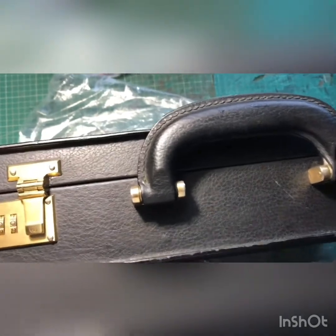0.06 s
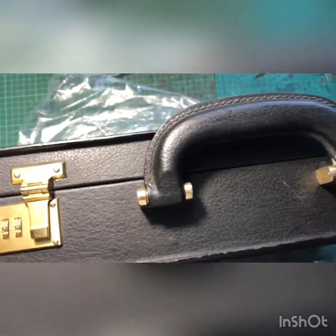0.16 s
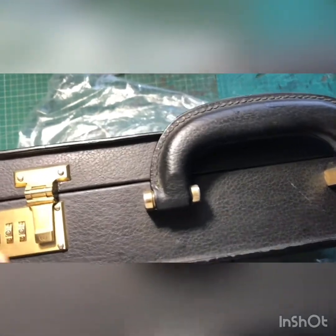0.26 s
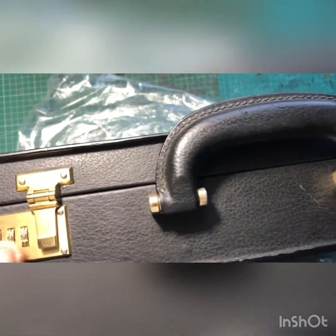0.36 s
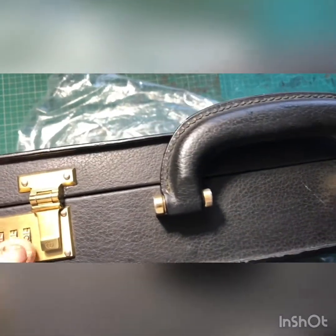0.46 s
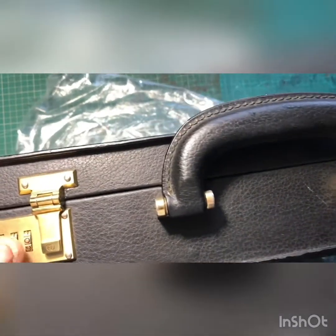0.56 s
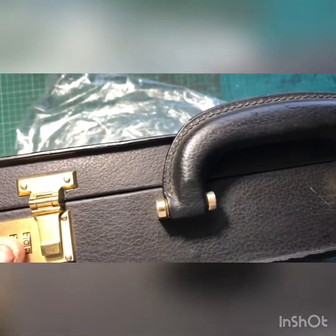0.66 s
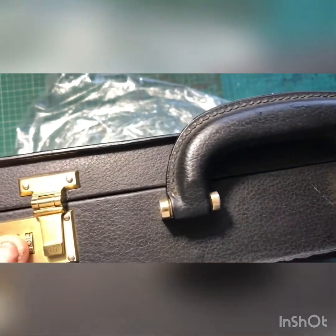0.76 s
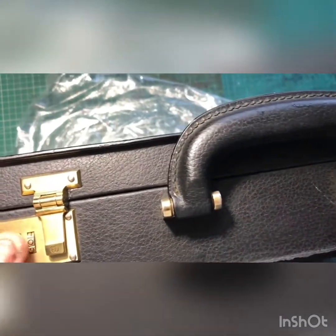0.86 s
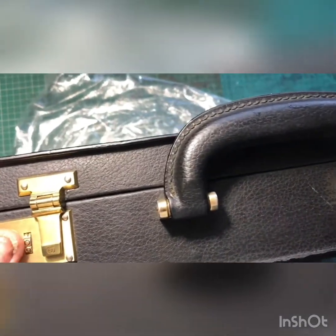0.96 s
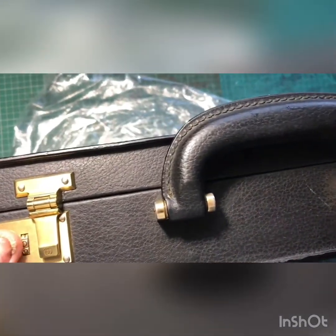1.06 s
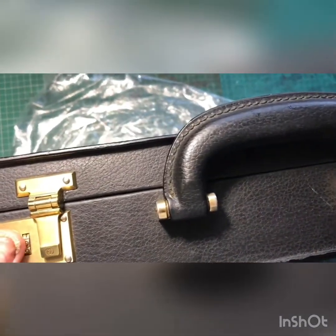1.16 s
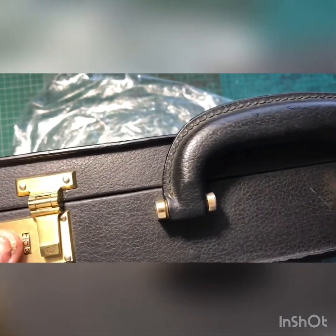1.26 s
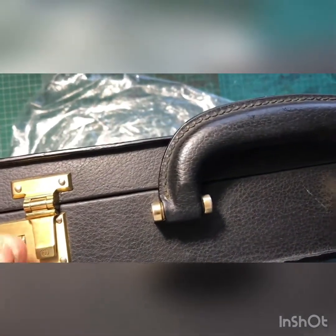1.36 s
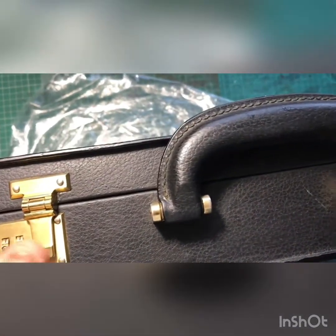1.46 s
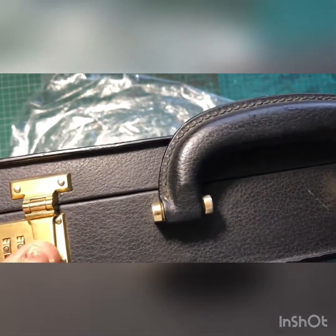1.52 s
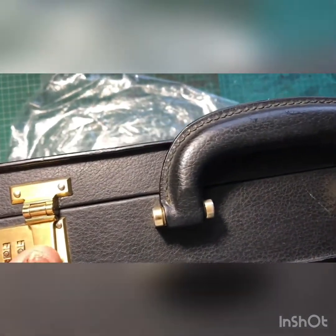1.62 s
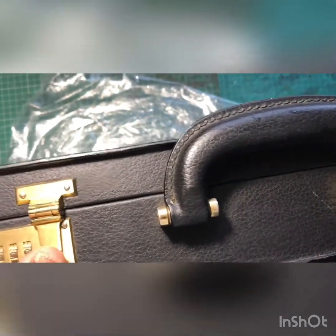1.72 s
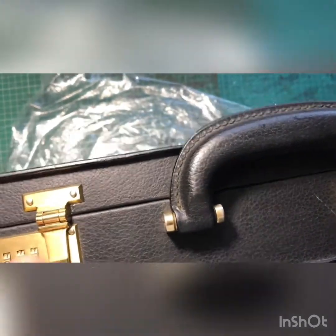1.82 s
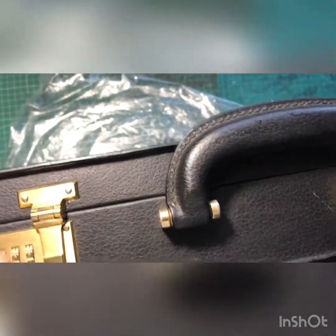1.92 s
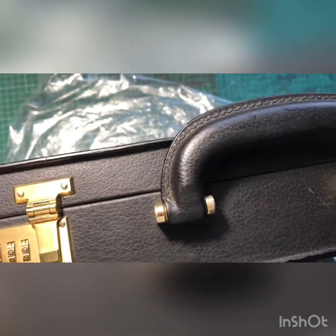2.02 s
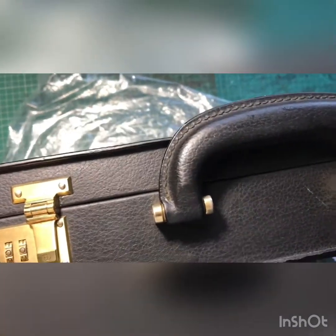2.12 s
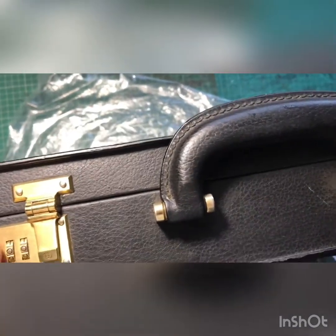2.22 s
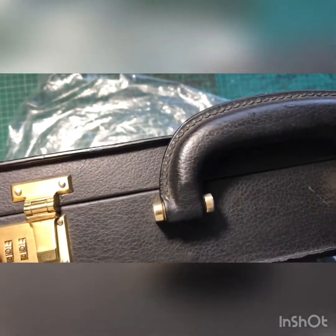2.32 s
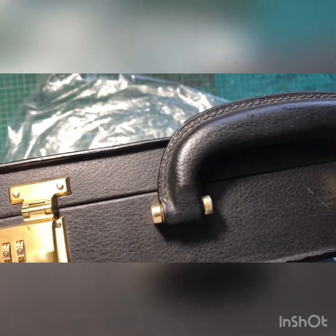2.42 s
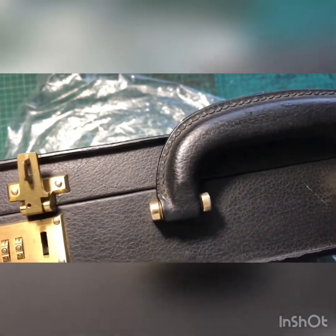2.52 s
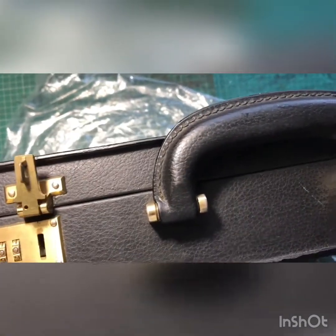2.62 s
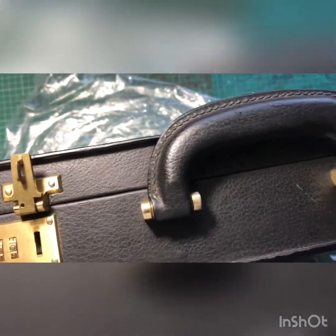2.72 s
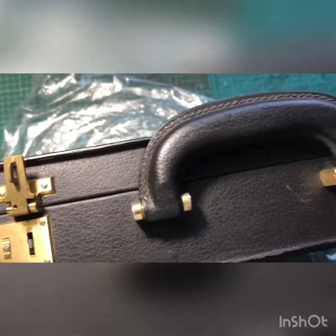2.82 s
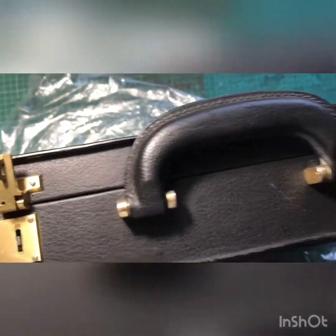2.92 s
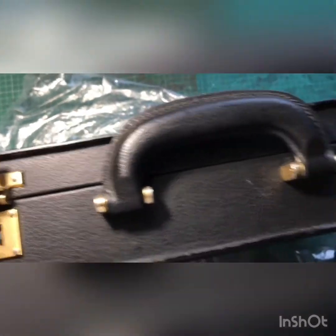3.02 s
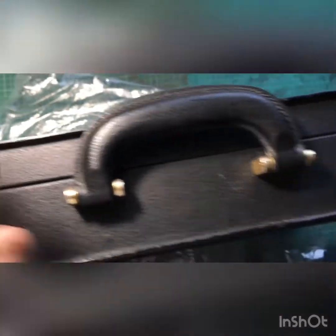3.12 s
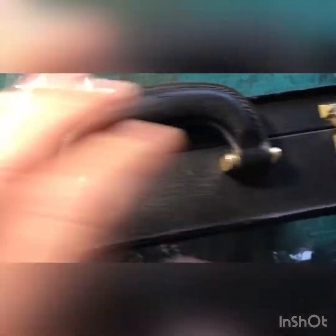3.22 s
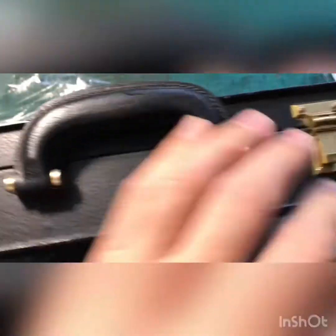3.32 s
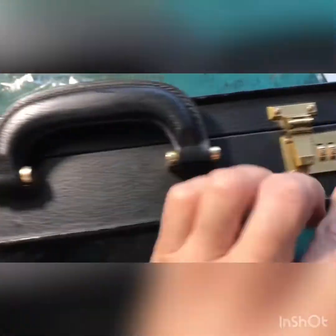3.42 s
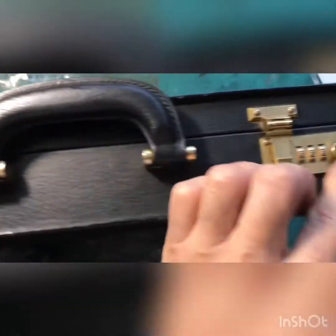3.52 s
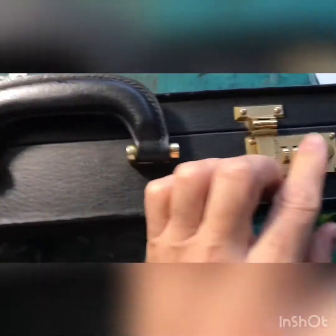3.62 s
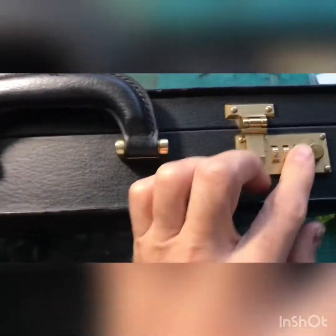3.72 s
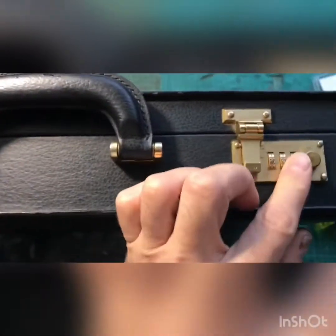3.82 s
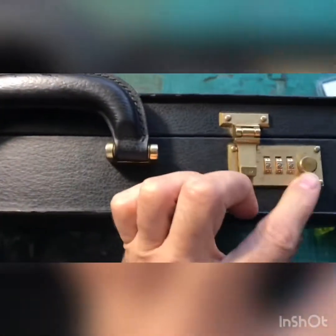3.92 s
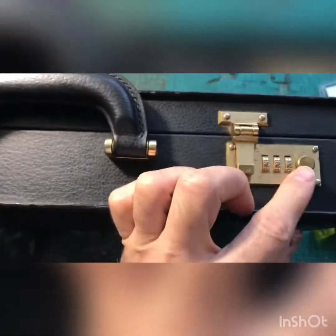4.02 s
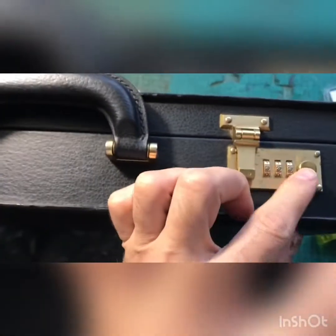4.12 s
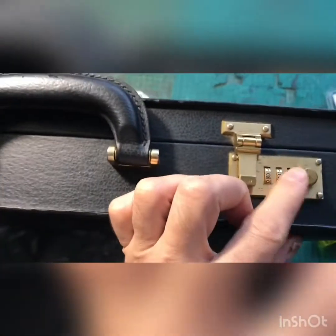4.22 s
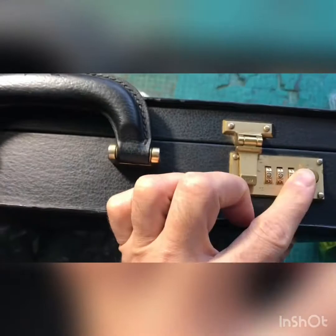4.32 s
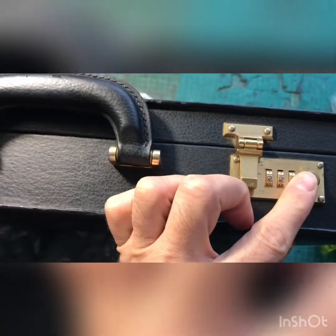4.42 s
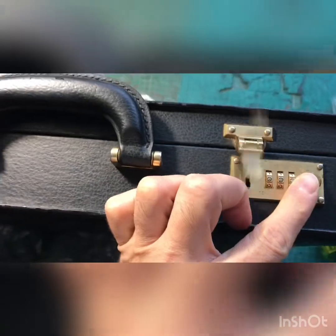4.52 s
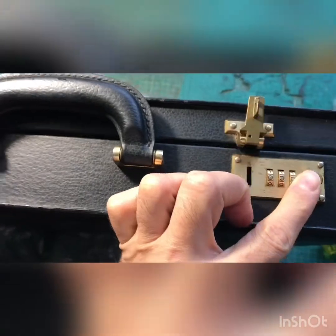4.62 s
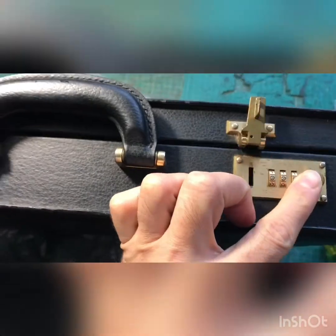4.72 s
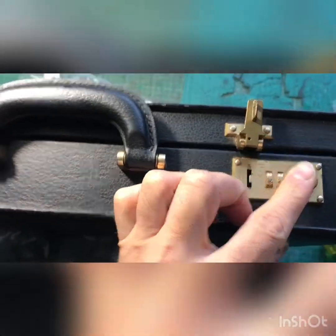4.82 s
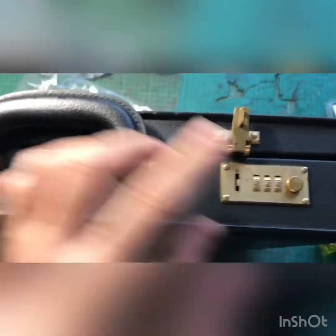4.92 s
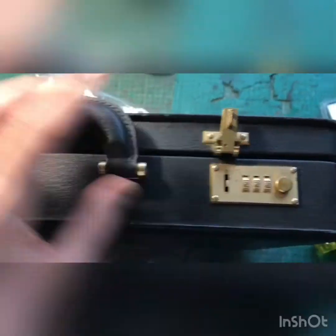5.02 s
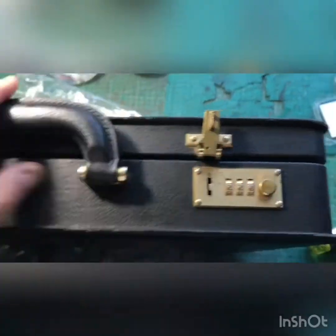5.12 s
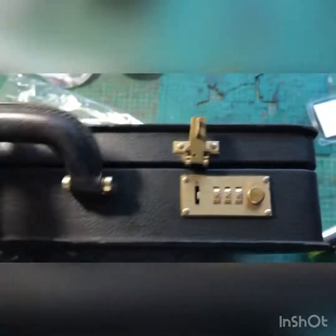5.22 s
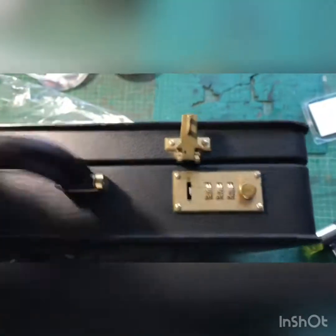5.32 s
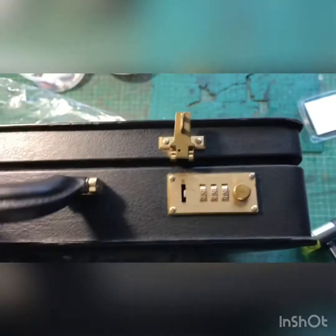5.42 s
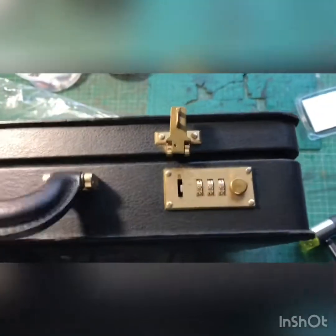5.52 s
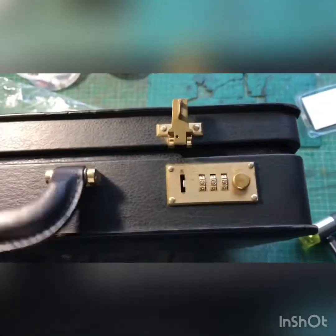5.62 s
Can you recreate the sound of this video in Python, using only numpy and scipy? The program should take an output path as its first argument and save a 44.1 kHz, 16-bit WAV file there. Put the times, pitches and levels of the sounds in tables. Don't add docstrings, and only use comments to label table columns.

```python
import sys
import numpy as np
from scipy import signal
from scipy.io import wavfile
from scipy.ndimage import uniform_filter1d

SR = 44100
rng = np.random.default_rng(int(sys.argv[2]) if len(sys.argv) > 2 else 0)


def level_to_linear(level):
    exponent = np.asarray(level, float) / 20
    return 10 ** exponent


def generate_wav(sig):
    pcm = np.round(np.clip(np.atleast_2d(sig).T, -1, 1) * 32767).astype(np.int16)
    wavfile.write(sys.argv[1], SR, pcm)


N = 249606

# frequency in Hz, level in dB, t60 in seconds.
PANEL_MODES = [(560, -7.5, 0.021), (680, -5.5, 0.045), (787, -4.5, 0.023), (800, -9.5, 0.045),
               (830, -14, 0.049), (977, 2, 0.05), (1035, -4.5, 0.12), (1059, -3.5, 0.019), (1152, 5, 0.037),
               (1236, 1.5, 0.046), (1344, 3, 0.054), (1448, -2, 0.05), (1502, 0.5, 0.04),
               (1585, -0.5, 0.032), (1705, 2, 0.068), (1808, -4, 0.037), (1971, -3.5, 0.049),
               (2240, -1.5, 0.01), (2260, -4, 0.0043), (2794, -4.5, 0.035)]
# start in seconds, force in dB,
# spot from body (0) over lock plate (.5) to hasp (1), loss across the lock in dB, weight on the case in dB.
HASP_BLOWS = [(2.3855, -24.5, 0, 20.5, -23), (2.3916, -6, 0.28, 20, -16), (2.3937, -12, 0.05, 29, -25),
              (2.4121, -39, .02, 10, -8), (2.4168, 4, .15, 11.5, -9), (2.4206, -0.5, 0.36, 18, -12.5),
              (2.4239, -6, .02, 11, -34.5), (2.446, 10, 0.26, 40, -12.5), (2.4505, -8, 0.46, 6.5, -28),
              (2.4564, -4.5, 0.13, 28, -29.5), (4.4708, -8.5, 0.34, 20.5, -15.5),
              (4.4886, -18.5, 0.34, 18.5, -15), (4.4967, 9, 0.17, 41, -12.5), (4.4986, -6, 0.1, 7.5, -17.5),
              (4.5028, 5, 0.09, 15.5, -7.5), (4.5233, -1.4, 0.03, 8.5, -30), (4.5362, -6, 0.03, 9.5, -13.5),
              (4.5434, -19.5, .02, 3.5, -39)]


def hasps():
    return blows(HASP_BLOWS, PANEL_MODES, length=0.65, deep=0, spread_db=3,
                 boom_off_db=-3.5, boom_length=.62, lowest_hz=250)


# frequency in Hz, level in dB, t60 in seconds.
HOUSING_MODES = [(1133, -9, 0.032), (1420, -3, 0.0239), (1523, 2.5, 0.011), (2300, 2, 0.02),
                 (2576, -2, 0.02), (3370, -10.5, 0.027), (4020, -9, 0.032), (4405, -13, .025)]
# start in seconds, force in dB,
# spot from body (0) to hasp (1), loss across the lock in dB, weight on the case in dB.
BUTTON_BLOWS = [(.8611, -28.5, .3, 38, -39.5), (1.4792, -28.5, 0.2, 20, -54),
                (1.7642, -7.5, .04, 11.5, -33), (2.3709, -34, 0, 13, -41), (2.6793, -28.5, 0.45, 11, -36),
                (2.6869, -46, .1, 4, -38), (2.7088, -17.5, 0.74, 10, -30), (2.7131, 0.5, 0.76, 35.5, -39.5),
                (2.7148, -10, .05, 8, -26), (2.9534, -37, 0.58, 18, -43.5),
                (3.5157, -39.5, 0.48, 22.5, -35.5), (3.6468, -30.5, 0.6, 7.5, -46.5),
                (4.1169, -21, 0.65, 29.5, -56.5), (4.7603, -19.5, 0.4, 34, -35.5),
                (5.068, -44, 1, 5.5, -28.5), (5.2187, -35, .55, 31, -37), (5.2269, -28.5, .3, 2.5, -24),
                (5.3815, -34.5, 0.36, 15, -33), (5.4746, -51, 0.2, 17, -43), (5.4993, -42, .02, 12, -41),
                (5.6069, -22, 0.27, 27, -34.5)]


def button_clicks():
    return blows(BUTTON_BLOWS, HOUSING_MODES, length=0.59, deep=0.08, spread_db=1.5,
                 boom_off_db=-3.5, boom_length=0.84, lowest_hz=850)


# start in seconds, force in dB, spot from body (0) to hasp
LOCK_TICKS = [(.5372, -38, 0), (.803, -34.5, 0.15), (.925, -53, .5), (1.519, -40, .6),
              (1.6022, -32.5, 0.78), (1.6065, -49, 0.5), (1.6321, -32, 0.7), (1.644, -34.5, .51),
              (1.6576, -36, .71), (1.6929, -28.5, 0.61), (1.7181, -29, 0.59), (1.756, -33, .51),
              (1.8807, -40, 0.5), (1.912, -43, .51), (2.186, -45, .73), (2.2374, -47.5, .51),
              (2.504, -40, .75), (2.825, -53, .97),
              (3.8058, -36, .25), (3.866, -40.5, .72), (3.886, -41.5, 0.75), (3.898, -42.5, 0.4),
               (4.128, -26.5, 0.44), (4.1605, -38, 0.15), (4.165, -43, 0.06), (4.739, -38, .05),
               (4.7624, -31, .97), (4.7645, -30.5, 0.46), (4.767, -33.5, 0.5), (5.1798, -36.5, 0.8),
               (5.4064, -38.5, 0.2), (5.418, -40.5, 0.86), (5.4268, -37, 0.17), (5.516, -39, .75),
               (5.5266, -38.5, 0.4)]


def light_ticks():
    loss_db, weight_db = 25.5, -20
    rows = [(s, db, spot, loss_db, db + weight_db) for s, db, spot in LOCK_TICKS]
    return blows(rows, HOUSING_MODES, length=.42, deep=0, spread_db=4.0,
                 boom_off_db=-1, boom_length=0.45, lowest_hz=1300)


# start in seconds, force in dB, weight on the case in dB.
FINGER_KNOCKS = [
    (1.4971, -26, -28),
    (1.9446, -27.5, -44),
    (4.0273, -26.5, -33),
    (4.224, -30, -38.5),
    (4.7316, -42, -64),
    (5.1157, -36.5, -36.5),
    (5.2979, -34, -26),
    (5.614, -35.5, -40),
]


def leather_knocks():
    loss_db = 24
    rows = [(s, db, 0, loss_db, weight_db) for s, db, weight_db in FINGER_KNOCKS]
    return blows(rows, PANEL_MODES, length=0.55, deep=0, spread_db=3.5,
                 boom_off_db=-3.5, boom_length=0.58, lowest_hz=250)


# frequency in Hz, level in dB, t60 in seconds.
CASE_MODES = [(153, -12.5, 0.091), (201.9, 1, 0.11), (230.7, -8, 0.13), (305, -3.5, 0.084),
              (402, -12.5, .08), (497, -12, 0.058)]


def blows(rows, body, length, deep, spread_db, boom_off_db, boom_length, lowest_hz):
    hard, boom = np.zeros(N), np.zeros(N)
    for s, force_db, spot, loss_db, boom_db in rows:
        body_db, plate_db, hasp_db = force_db - loss_db * abs(spot - np.arange(3) / 2)
        lasting = length + deep * (.5 - spot)
        body_ring = ring(body, lasting * 0.87, spread_db, rise_s=0.00036)
        plate = crack(1700, 8000, t60=.021, tilt_db=-13, length=lasting, scatter=0.93)
        hasp = crack(6200, 17500, t60=.014, tilt_db=0, length=lasting, scatter=0.49)
        add(hard, s, level_to_linear(body_db) * body_ring)
        add(hard, s, level_to_linear(plate_db - 3.5) * plate)
        add(hard, s, level_to_linear(hasp_db + 2.0) * hasp)
        case = ring(CASE_MODES, boom_length, spread_db=3.0, rise_s=0.0073)
        add(boom, s, level_to_linear(boom_db + boom_off_db) * case)
    high_pass = signal.butter(3, lowest_hz, "high", fs=SR, output="sos")
    return boom + signal.sosfilt(high_pass, hard)


def ring(modes, length, spread_db, rise_s):
    hz, db, t60 = np.transpose(modes)[:, :, None]
    t60 = t60 * max(length, .05)
    t = np.arange(round(t60.max() * SR)) / SR
    level_spot, pitch_spot = rng.standard_normal((2, len(modes), 1))
    decay = level_to_linear(db + spread_db * level_spot - 60 * t / t60)
    tones = decay * np.sin(2 * np.pi * hz * (1 + .008 * pitch_spot) * t)
    sound = -tones.sum(0) * (1 - np.exp(-t / rise_s))
    return sound / abs(sound).max()


def crack(low_hz, high_hz, t60, tilt_db, length, scatter):
    t = np.arange(1000) / SR
    shift, phase = rng.random((2, 48, 1))
    place = (np.arange(48)[:, None] + shift) / 48
    size = level_to_linear(tilt_db * place) * np.sqrt(np.sin(np.pi * place))
    hz = low_hz + (high_hz - low_hz) * place
    modes = size * np.sin(2 * np.pi * (hz * t + scatter * phase))
    decay = level_to_linear(-60 * t / (t60 * max(length, .05)))
    sound = modes.sum(0) * decay * (1 - np.exp(-t / .0001))
    return sound / abs(sound).max()


# start in seconds, length in seconds, frequency in Hz,
# width of its wander in Hz, level in dB.
BUTTON_SQUEAKS = [
    (2.700, .013, 5200, 120, -27),
    (2.726, .010, 8100, 80, -32),
    (4.451, .010, 8100, 80, -62),
    (4.471, .016, 8150, 90, -15),
    (4.484, .010, 8100, 90, -33),
    (4.472, .005, 15000, 300, -24),
    (4.476, .006, 15100, 300, -26),
]


def squeaks():
    out = np.zeros(N)
    for s, length, hz, width_hz, db in BUTTON_SQUEAKS:
        n = round(length * SR)
        wander = width_hz * evened(uniform_filter1d(rng.standard_normal(6000), size=60))[:n]
        phase = 2 * np.pi * np.cumsum(hz + wander) / SR
        add(out, s, level_to_linear(db) * np.sin(phase) * np.hanning(n) ** .7)
    return out


# start in seconds, frequency in Hz, level in dB, t60 in seconds.
SPRING_TONES = [
    (2.7132, 8040, -7, .015),
    (2.7132, 8134, -41, .22),
    (2.7132, 15250, -11, .012),
    (2.7132, 3390, -17, .016),
    (4.7602, 12800, -46, .05),
    (4.7602, 15500, -46, .02),
    (4.7602, 9700, -44, .02),
]


def button_springs():
    out, t = np.zeros(N), np.arange(9000) / SR
    for s, hz, db, t60 in SPRING_TONES:
        add(out, s, level_to_linear(db - 60 * t / t60) * np.sin(2 * np.pi * hz * t))
    return out


# frequency in Hz, level in dB per Hz.
RUB_SPECTRUM = [(1760, -26.5), (3000, -3), (3720, -5), (8500, -2), (10400, -6), (15000, -1.5), (16200, -10),
                (16500, -31.5)]
# start in seconds, length in seconds, hiss in dB, scrape in dB,
# sharpness of the start 0-1.
SCUFFS = [(0.045, 0.13, -73, -86, 0.2), (.32, 0.054, -74, -90, .1), (0.469, 0.15, -62.5, -70, 0.02),
          (.9, .07, -75, -87, 0.1), (1.347, 0.064, -70.5, -90, 0.5), (1.475, 0.13, -64, -69, 1),
          (1.599, 0.19, -59.5, -61, 1), (1.755, 0.033, -83, -73, .9), (2.36, 0.019, -62, -48.5, 0.15),
          (2.678, 0.067, -55.5, -43, 1), (3.337, 0.051, -76.5, -78.5, 0.14), (3.637, 0.21, -71.5, -69, 1),
          (3.795, 0.15, -73, -72, 0.68), (4.117, 0.021, -71, -58.5, 0.6), (4.722, 0.066, -66, -51.5, 0.6),
          (5.054, 0.12, -65, -61.5, 0.6), (5.172, 0.11, -64.5, -64, 0.4), (5.255, 0.12, -58.5, -67, 0.13),
          (5.356, 0.19, -69, -66.5, 0.8), (5.602, 0.06, -64, -53, 0.5)]


def scuffs():
    hiss, scrape = np.zeros(N), np.zeros(N)
    for s, length, hiss_db, scrape_db, sharp in SCUFFS:
        u = np.linspace(0, 1, round(length * SR))
        attack = np.minimum(u / np.clip(.5 - 1.23 * sharp, .01, 1), 1)
        release = np.minimum((1 - u) / 0.25, 1) ** 1.3
        add(hiss, s, level_to_linear(hiss_db) * attack * release)
        add(scrape, s, level_to_linear(scrape_db) * attack * release)
    grain = level_to_linear(2.5 * evened(uniform_filter1d(rng.standard_normal(N), size=150)))
    brass = noise([(500, -15), (900, 6.5), (2500, 4.0), (4500, -0.5), (7000, -35.5)], patchy_db=3)
    return grain * (hiss * noise(RUB_SPECTRUM, patchy_db=0.0) + scrape * brass)


# time in seconds, shaking of the case in dB, grip on the phone in dB.
HANDLING = [(0.0, -57, -64), (0.58, -60.5, -65), (0.91, -56, -66), (1.26, -56, -72), (1.53, -54.5, -63.5),
            (1.92, -54, -66), (2.18, -56.5, -66), (2.36, -54, -64), (2.6, -53.5, -67), (2.77, -55.5, -67),
            (3.31, -50, -66.5), (3.67, -51, -59), (4.1, -49.5, -64), (4.43, -52, -59), (5.11, -47.5, -69.5),
            (5.49, -47.5, -57), (5.66, -47.5, -62)]


def handling():
    s, *columns = np.transpose(HANDLING)
    shake_db, rumble_db = (np.interp(np.arange(N) / SR, s, c) for c in columns)
    above_calm_db = shake_db + 54
    far_db = -64 + .15 * above_calm_db
    murmur_db = -64 + 0.93 * above_calm_db
    far = noise([(700, -26.5), (1000, 3.5), (1700, -3.5), (3000, -10), (5000, -25)], patchy_db=0.5)
    murmur = noise([(280, -34.5), (350, 4), (600, 2), (900, 1.0), (1200, -36.0)], patchy_db=0.0)
    shake = noise([(90, -15.0), (125, 2.5), (160, 6.5), (200, 8.5), (250, -6), (320, -3.5), (420, -45.5)],
                  patchy_db=1.5)
    rumble = noise([(15, -29.5), (30, -5), (40, 12.5), (65, -1), (85, -12.5), (105, -34)], patchy_db=2.0)
    distant = level_to_linear(far_db - 1.5) * far + level_to_linear(murmur_db - 1) * murmur
    return distant + level_to_linear(shake_db - 0.5) * shake + level_to_linear(rumble_db + 3.7) * rumble


# frequency in Hz, t60 in seconds.
ROOM_DECAY = [(150, 0.26), (500, 0.39), (1200, 0.27), (3000, 0.24), (8000, 0.21), (15000, 0.14)]


def room(x):
    out, turn = np.zeros(N), np.arange(N) / SR * 2 * np.pi * 17
    at = np.arange(120, SR // 2 - 20, 20)
    for k in range(3):
        taps = np.zeros(SR // 2)
        taps[at + rng.integers(0, 20, len(at))] = rng.choice([-1., 1.], len(at))
        hz, t, z = signal.stft(taps, SR, nperseg=256)
        decay = level_to_linear(-60 * t / read(ROOM_DECAY, hz)[:, None])
        tail = signal.istft(z * decay, SR, nperseg=256)[1]
        share = np.sqrt(2 / 3) * np.cos(turn + k * np.pi / 3)
        out += signal.fftconvolve(x * share, tail / np.linalg.norm(tail))[:N]
    return out


# frequency in Hz, level in dB per Hz.
AIR_SPECTRUM = [(18, -56), (33, -21), (60, -9.5), (98, -31), (130, -9), (200, -6.5), (300, -14.5),
                (500, -25), (1140, -23.5), (1740, -25.5), (3500, -37), (6000, -43), (10500, -55.5),
                (13000, -51), (16500, -51)]


def room_tone():
    return level_to_linear(-58) * noise(AIR_SPECTRUM, patchy_db=1.5)


def noise(spectrum, patchy_db):
    frames, hz = N // 256 + 5, np.fft.rfftfreq(1024, 1 / SR)
    a, b, patches = rng.standard_normal((frames, 513, 3)).T
    patches = uniform_filter1d(patches, size=14, axis=0)
    patches = evened(uniform_filter1d(patches, size=10, axis=1))
    z = (a + 1j * b) * level_to_linear(read(spectrum, hz)[:, None] + patchy_db * patches)
    return evened(signal.istft(z, nperseg=1024, noverlap=768)[1][:N])


def evened(x):
    return x / np.sqrt(np.mean(x ** 2) + 1e-20)


def read(points, hz):
    f, value = np.transpose(points)
    return np.interp(np.log(hz + 1), np.log(f + 1), value)


def add(mix, s, sound):
    part = mix[round(s * SR):][:len(sound)]
    part += sound[:len(part)]


def scene():
    slams = hasps()
    touches = button_clicks() + light_ticks() + leather_knocks()
    tones = squeaks() + button_springs()
    echo = level_to_linear(-12.0) * room(slams + level_to_linear(-3.5) * touches + level_to_linear(-11.5) * tones)
    return (slams + touches + tones + echo + scuffs() + handling() + room_tone())[None]


def roll_off(x):
    return signal.sosfilt(signal.butter(12, 16990, fs=SR, output="sos"), x)


def record(dry):
    limited = np.tanh(dry / .96) * .96
    limited = signal.sosfilt(signal.butter(2, 28, "high", fs=SR, output="sos"), limited)
    lowpass = signal.firwin(255, 15850, window=("kaiser", 8), fs=SR)[None]
    return roll_off(signal.oaconvolve(limited, lowpass, "same"))


dry = scene()
out = record(dry)
generate_wav(out)
```